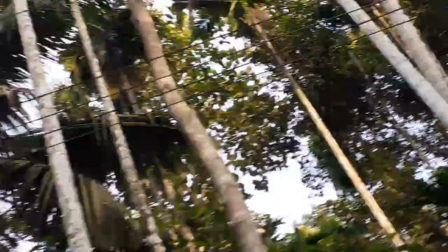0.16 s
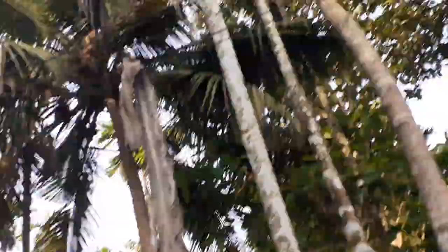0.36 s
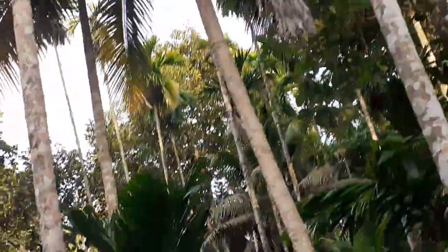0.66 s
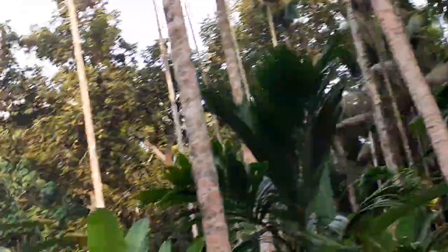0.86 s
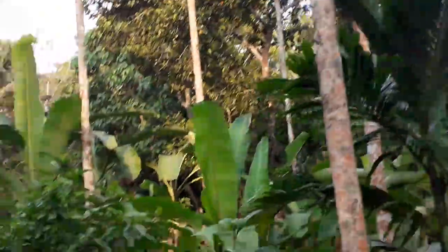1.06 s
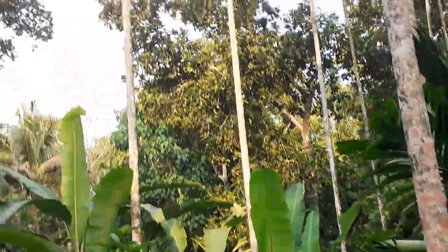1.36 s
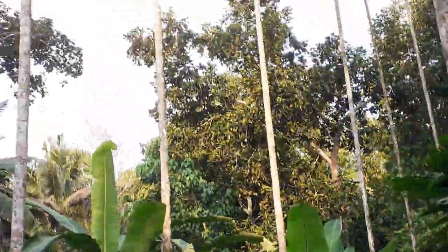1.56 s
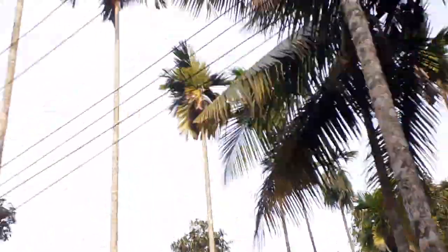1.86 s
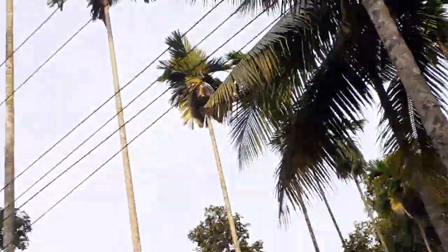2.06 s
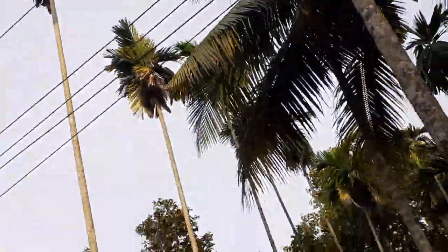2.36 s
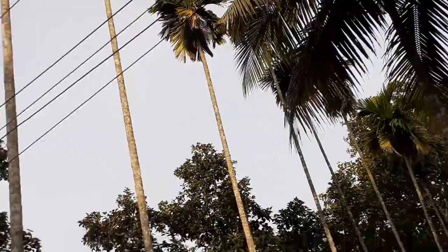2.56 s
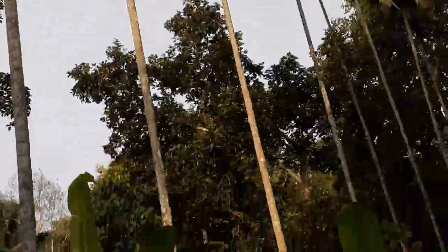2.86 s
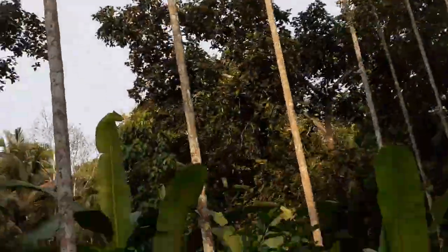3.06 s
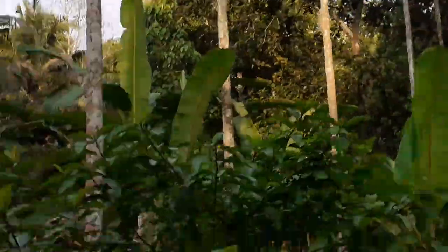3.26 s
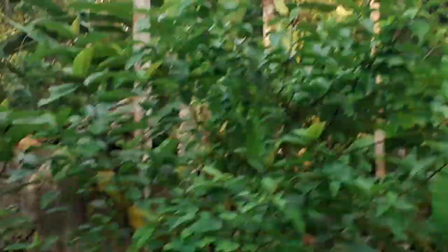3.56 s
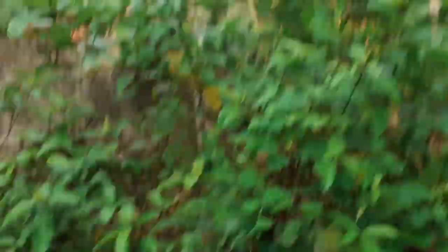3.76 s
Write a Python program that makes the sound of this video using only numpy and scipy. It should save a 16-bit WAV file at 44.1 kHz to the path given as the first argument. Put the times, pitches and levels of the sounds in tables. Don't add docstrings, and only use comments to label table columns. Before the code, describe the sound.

Cicadas shrill close by throughout, a dense raspy buzz near 9 kHz, nearly steady and fading very slightly. Slow footsteps crush dry leaves about every half second, with twig snaps clearest near 1.1, 1.9, 2.5 and 3.5 s. Dull knocks hit the handheld microphone at 0.3 and 2.5 s. Faint far crows caw; a small bird chips from 1.4 s, loudest at 2.9. Light breeze and foliage rustle softly.

```python
import sys
import numpy as np
from scipy import signal
from scipy.fft import rfft, irfft, next_fast_len
from scipy.io import wavfile
from scipy.ndimage import uniform_filter1d, map_coordinates

SR = 44100
rng = np.random.default_rng(int(sys.argv[2]) if len(sys.argv) > 2 else 0)


def dump(signal):
    limited = np.clip(np.atleast_2d(signal).T, -1, 1)
    pcm = np.round(limited * 32767).astype(np.int16)
    wavfile.write(sys.argv[1], SR, pcm)


def to_linear_factor(level_db):
    exponent = np.asarray(level_db, float) / 20
    return 10 ** exponent


N = 171990


# t [s], level [dB]
CHORUS_LEVEL = [(0, -42), (.22, -39.5), (.6, -40.5), (1.0, -41.5), (1.5, -41), (2.0, -41), (2.4, -41.5),
                (2.8, -41.5), (3.2, -42), (3.6, -42), (3.9, -42.5)]
# f [Hz], width [Hz], spread between singers [Hz], level [dB]
CICADA_BODIES = [(2247, 100, 28.4, -15), (2248, 390, 71, -16), (4600, 726, 150, -15.5),
                 (6670, 1560, 215, -23), (8214, 610, 150, -15), (8950, 450, 111, 0.5), (9460, 190, 75, -18),
                 (11170, 580, 91, -29), (13400, 1000, 150, -28.5)]


def cicadas():
    singers = 7
    click_hz, rate_spread, rate_drift, click_rough = 199.35, 0.15, 0.03, 0.51
    swell_db, slow_swell_db = 2.5, 0.6
    far_singers = 0.092
    trains = []
    for place in np.linspace(-1, 1, singers):
        rate = click_hz * (1 + rate_spread * place + rate_drift * wobble(12))
        turns = np.cumsum(rate) / SR
        clicks = np.diff(np.floor(turns), prepend=0) * (1 + click_rough * rng.standard_normal(N))
        clicks = clicks + far_singers * rng.standard_normal(N)
        trains.append(clicks * to_linear_factor(swell_db * wobble(15) + slow_swell_db * wobble(2.35)))
    f, spectra = np.fft.rfftfreq(N, 1 / SR), rfft(np.array(trains), N)
    total = 0
    for hz, wide, spread, db in CICADA_BODIES:
        tuned = hz + spread * rng.permutation(np.linspace(-1.5, 1.5, singers))[:, None]
        late = np.exp(-2j * np.pi * f * rng.uniform(0, 0.1, (singers, 1)))
        band = np.sum(spectra * late * peak(f, tuned, wide), axis=0)
        total = total + to_linear_factor(db) * band / np.linalg.norm(band) * N / np.sqrt(2)
    return to_linear_factor(curve(CHORUS_LEVEL)) * irfft(total, N)[:N]


# t [s], length [s], level [dB]
KATYDID_SPELLS = [
    (0, 0.6, -56),
    (1.334, 0.32, -58),
]


def katydid():
    t = np.arange(N) / SR
    spells = 0
    for s, long, db in KATYDID_SPELLS:
        spells = spells + to_linear_factor(db) * np.clip(np.minimum(t - s + 0.058, s + long - t) / 0.12, 0, 1)
    return spells * rush(lambda f: peak(f, 9700, 860), patchy_db=1.5)


# t [s], length [s], hiss level [dB], snap level [dB], hiss tilt [dB/octave]
FOOTSTEPS = [
    (0.177, 0.072, -49, -52.5, -4),
    (0.726, 0.063, -49.5, -50, -14),
    (1.276, .11, -48.5, -53.5, -8.5),
    (1.88, 0.047, -53, -51, -2),
    (2.392, 0.085, -47.5, -49.5, -7),
    (2.973, 0.071, -65, -58.5, 1),
    (3.413, 0.038, -58, -64, -3),
    (3.4803, 0.07, -44, -52, -6.5),
]


def steps():
    grains, grain_hz, grain_octaves, grain_cycles, grain_db = 22, 1644, 0.96, 2.8, 4.5
    fade_db, tail_s, flicker_db = -10, 0.35, 3
    out, t = np.zeros(N), np.arange(SR // 2) / SR
    for s, long, hiss_db, snap_db, tilt_db in FOOTSTEPS:
        def leaf_tone(f):
            return f * f / (f * f + 700 ** 2) * to_linear_factor(tilt_db * np.log2(1 + f / 1500))

        hiss = filtered(rng.standard_normal(N) * to_linear_factor(flicker_db * wobble(67)), leaf_tone)
        fade = fade_db * t / long - 20 * np.clip(t - long, 0, 9) / tail_s
        onset = np.clip(t / 0.00062, 0, 1)
        add(out, s, to_linear_factor(hiss_db + fade) * unit(hiss[:len(t)]) * onset)
        for when, pitch, size in zip(rng.random(grains), *rng.standard_normal((2, grains))):
            hz = grain_hz * 2 ** (grain_octaves * np.clip(pitch, -1, 2.5))
            add(out, s + 1.1 * long * when, to_linear_factor(snap_db + grain_db * size) * ping(hz, grain_cycles))
    return filtered(out, lambda f: (1j * f / (450 + 1j * f)) ** 2)


# t [s], peak level [dB], f [Hz], ring [cycles]
SNAPS_AND_THUDS = [(.171, -45.5, 695, 1.4), (0.2952, -50, 1160, 0.86), (.772, -46, 5500, 2), (.81, -41.5, 1010, 4.2),
                   (.947, -48, 744, 4), (1.102, -33, 1790, 0.72), (1.372, -42, 1960, 0.63), (2.292, -43, 1500, 1.7),
                   (2.59, -50, 1300, 1.9), (2.708, -60, 560, 1.5), (2.962, -55, 620, 2.1), (3.023, -36.5, 1250, 1.4),
                   (3.207, -44, 476, 1.2), (0.899, -50.5, 70, 2.3), (3.16, -44.5, 70, 1.6), (3.21, -54, 64.6, 1.5),
                   (3.24, -45, 74.5, 2.2), (3.578, -47.5, 640, 1.4), (3.675, -39.5, 1500, 1.4),
                   (.177, -39, 5000, 1.5), (0.22, -42, 1320, 2.5), (.231, -45, 1690, 2.6), (0.263, -44, 1200, 1.8),
         (1.879, -44, 885, 1.5), (1.8897, -30.5, 6050, 1.4), (1.89, -38.5, 1900, 1.8),
         (1.8927, -31, 6030, 1.7), (1.8916, -46, 1300, 1.2), (1.902, -37, 1100, 1.2),
         (1.913, -49, 2600, 1.5), (1.9327, -41, 1200, 2), (1.936, -38, 1200, 1.5),
         (1.9397, -29, 1040, 1.13), (1.944, -32, 1200, 2.8), (1.942, -43.5, 2780, 2.4),
         (2.392, -43, 1500, 1.8), (2.395, -44, 4800, 2.2), (2.403, -47, 1800, 2), (2.409, -37.5, 4830, 4.8),
         (2.415, -45.5, 1010, 2.3), (2.419, -41, 1600, 2.8), (2.424, -40, 4500, 1.1),
         (2.431, -42, 1400, 4.6), (2.4349, -35.5, 1700, 3.1), (2.443, -39, 1800, 2.5),
         (2.453, -34, 1930, 2.8), (2.4535, -42, 5500, 1.5), (2.482, -34, 5500, 1.6), (2.483, -46, 1500, 2),
         (2.4881, -30, 2000, 0.65), (3.429, -47.5, 1500, 8.2), (3.438, -48, 1500, 7.4),
         (3.431, -53, 5500, 20), (3.441, -54, 6100, 20), (3.451, -47, 6250, 20), (3.482, -39.5, 3170, 2),
         (3.483, -41, 11000, 3), (3.512, -38, 1500, 1.1), (3.522, -39.5, 1500, 3.6), (3.5375, -33, 1690, 2),
         (3.544, -37, 1810, 2), (3.547, -36.5, 1800, 2)]


def twigs():
    out = np.zeros(N)
    for s, db, hz, cycles in SNAPS_AND_THUDS:
        add(out, s, to_linear_factor(db) * ping(hz, cycles))
    return out


# t [s], peak level [dB], f [Hz]
CASE_KNOCKS = [
    (0.285, -38, 448),
    (0.2959, -19, 370),
    (2.4892, -22.5, 410),
]


def knocks():
    rise_s, sag, sag_s = 0.00061, 7.4, 0.00041
    out, t = np.zeros(N), np.arange(SR // 25) / SR
    for s, db, hz in CASE_KNOCKS:
        turns = hz * (t + sag * sag_s * (1 - np.exp(-t / sag_s)))
        u = t / rise_s / 3
        thump = (u * np.exp(1 - u)) ** 3
        add(out, s, -to_linear_factor(db) * thump * np.sin(2 * np.pi * (turns + 0.25)))
    return out


# t [s], level [dB], starting f [Hz]
BIRD_CHIPS = [
    (1.44, -46, 2510),
    (2.065, -44.5, 2530),
    (2.214, -41.5, 2559),
    (2.825, -52.5, 1736),
    (2.885, -35.5, 2496),
    (3.25, -52, 2346),
    (3.483, -40, 2530),
]


def chips():
    peak_s, fall, fall_s = 0.0074, 0.3, 0.00942
    tail_db, tail_s, rough = -16.5, 0.057, 0.71
    out, t = np.zeros(N), np.arange(SR // 5) / SR
    for s, db, hz in BIRD_CHIPS:
        pitch = hz * (1 - fall * (1 - np.exp(-t / fall_s)))
        tone = np.sin(2 * np.pi * np.cumsum(pitch) / SR)
        burst = (t / peak_s * np.exp(1 - t / peak_s)) ** 2
        tail = to_linear_factor(tail_db) * np.minimum(t / peak_s, 1) * np.exp(-t / tail_s)
        grain = 1 + rough * rasp(len(t), 470)
        add(out, s, to_linear_factor(db) * (burst + tail) * grain * tone)
    return out


# t [s], length [s], f [Hz], level [dB]
HIGH_CAWS = [
    (.02, 0.25, 1146, -61.5),
    (.66, 0.19, 1217, -53.5),
    (.9, 0.094, 1255, -62.5),
    (1.4, 0.28, 1263, -68.5),
    (1.935, 0.17, 1174, -52.5),
    (2.16, 0.16, 1180, -66),
    (3.135, 0.22, 1219, -56.5),
]


def high_crow():
    return crow(HIGH_CAWS, -34.0, 74.8, 1.0, 0.0101, 0.8, 0.035)


# t [s], length [s], f [Hz], level [dB]
LOW_CAWS = [
    (.47, 0.39, 891.4, -58.5),
    (1.55, 0.26, 903, -60),
    (1.63, 0.3, 1027, -66),
    (1.7, 0.18, 865, -72),
    (2.79, 0.17, 1098, -62.5),
    (3.23, 0.23, 419.5, -64.5),
]


def low_crow():
    return crow(LOW_CAWS, -10, 44.8, 1.0, 0.008, 0.3, 0.09)


def crow(calls, overtone_db, rattle_hz, rattle, hoarse, rough, arch):
    rise_s, fall_s = 0.036, 0.053
    out = np.zeros(N)
    for s, long, hz, db in calls:
        t = np.arange(round((long + fall_s) * SR)) / SR
        bow = np.sin(np.pi * np.clip(t / long, 0, 1)) ** 0.5 - 0.8
        pitch = hz * (1 + arch * bow + hoarse * wobble(54.25)[:len(t)])
        turn = 2 * np.pi * np.cumsum(pitch) / SR
        rattle_turn = 2 * np.pi * np.cumsum(rattle_hz * (1 + 0.11 * wobble(24.9)[:len(t)])) / SR
        flutter = 1 + rattle * np.sin(rattle_turn) + rough * rasp(len(t), 153)
        shape = np.clip(np.minimum(t / rise_s, (long + fall_s - t) / fall_s), 0, 1)
        tone = np.sin(turn) + to_linear_factor(overtone_db) * np.sin(2 * turn)
        add(out, s, to_linear_factor(db) * shape * flutter * tone)
    return out


# t [s], level [dB]
GUSTS = [(0.0, -81), (0.19, -67), (0.3, -58), (0.45, -64.5), (0.63, -63.5), (0.84, -58), (0.91, -60),
         (1.0, -61), (1.34, -65), (1.6, -74), (1.82, -66), (2.38, -66), (2.5, -62), (3.12, -67),
         (3.17, -53), (3.3, -56.5), (3.4, -58.5), (3.9, -62.5)]
# f [Hz], level [dB]
BUFFET_TONE = [(13, -62), (22, -28), (40, 5.5), (59, 1), (112, -4.5), (166, -10.5), (220, -20),
               (290, -19.5), (480, -120)]


def breeze():
    buffet = rush(lambda f: to_linear_factor(along(BUFFET_TONE, f)), patchy_db=2.5)
    return to_linear_factor(curve(GUSTS) + 0.6 * wobble(49)) * buffet


# t [s], level [dB]
LEAF_LEVEL = [(0.0, -59.5), (0.14, -61.5), (0.54, -63.5), (0.87, -59), (1.18, -64), (1.55, -58),
              (1.83, -60.5), (2.05, -69), (2.57, -67), (2.81, -72.5), (3.02, -62), (3.14, -66.5),
              (3.25, -51.5), (3.4, -60), (3.69, -63), (3.9, -68)]
# f [Hz], level [dB]
LEAF_TONE = [(110, -3.5), (200, -5.5), (450, -1.5), (800, -5.5), (1150, -1), (1500, -9.5), (2400, -110)]


def undergrowth():
    rustle = rush(lambda f: to_linear_factor(along(LEAF_TONE, f)), patchy_db=3.5)
    return to_linear_factor(curve(LEAF_LEVEL) - 1.5 + wobble(18)) * rustle


# t [s], level [dB]
MURMUR_LEVEL = [(0.0, -70), (0.15, -72), (0.76, -58.5), (1.13, -73), (1.35, -55), (1.45, -66), (2.4, -62),
                (2.62, -65), (2.79, -72), (3.49, -56), (3.68, -61.5), (3.9, -69.5)]


def murmur():
    return to_linear_factor(curve(MURMUR_LEVEL)) * rush(lambda f: peak(f, 1500, 1640), patchy_db=4)


# t [s], level [dB]
CRICKET_LEVEL = [(0.0, -58.5), (0.15, -55), (0.32, -49), (0.55, -48.5), (0.93, -52.5), (1.1, -55.5),
                 (1.62, -107), (3.3, -138), (3.52, -55), (3.65, -51.5), (3.9, -50)]


def far_crickets():
    crowd = rush(lambda f: peak(f, 3025, 1460), patchy_db=-1.0)
    return to_linear_factor(curve(CRICKET_LEVEL) - 8.0) * (crowd + single_crickets())


# f [Hz], level over the crowd [dB]
CRICKET_STRANDS = [(2750, -14), (3040, -6), (3170, -9.5), (3410, -15.5)]


def single_crickets():
    out = 0
    for hz, db in CRICKET_STRANDS:
        pitch = hz * (1 + 0.02 * wobble(11))
        swell = to_linear_factor(db + 3.5 * wobble(14))
        out = out + swell * np.sin(2 * np.pi * np.cumsum(pitch) / SR)
    return out


# f [Hz], level [dB]
AIR_TONE = [(2300, -53), (2600, -26), (3300, -53), (4000, 2), (5700, -12.5), (10500, -7), (12200, -13.5),
            (15700, -13.5)]


def far_hiss():
    return to_linear_factor(-61) * rush(lambda f: to_linear_factor(along(AIR_TONE, f)), patchy_db=1.5)


def grove(x, t60):
    tail = rng.standard_normal(SR // 2) * to_linear_factor(-60 * np.arange(SR // 2) / SR / t60)
    return signal.fftconvolve(np.pad(x, (600, 0)), tail / np.linalg.norm(tail))[:N]


def unit(x):
    return x / np.sqrt(np.mean(x ** 2) + 1e-20)


def along(points, hz):
    f, v = np.transpose(points)
    return np.interp(np.log(hz + 1), np.log(f + 1), v)


def curve(rows):
    s, v = np.transpose(rows)
    return np.interp(np.arange(N) / SR, s, v)


def wobble(rate):
    knots = rng.standard_normal(int(N * 60 / SR) + 4)
    return map_coordinates(knots, [np.arange(N) * min(rate, 59) / SR])


def rasp(count, wide_hz):
    span = max(1, round(SR / wide_hz / 2))
    smooth = uniform_filter1d(uniform_filter1d(rng.standard_normal(SR), span), span)
    return unit(smooth)[:count]


def ping(hz, cycles):
    u = np.arange(SR // 25) / SR * hz
    return np.sin(2 * np.pi * u) * np.exp(-2 * u / cycles) * (1 - np.exp(-u / 0.37)) * 3


def filtered(x, response):
    m = next_fast_len(N + SR // 2)
    return irfft(rfft(x, m) * response(np.fft.rfftfreq(m, 1 / SR)), m)[..., :N]


def peak(f, hz, wide):
    return (1j * f * wide / (hz * hz - f * f + 1j * f * wide)) ** 3


def rush(response, patchy_db):
    z = signal.stft(rng.standard_normal(N), nperseg=512)[2]
    field = uniform_filter1d(rng.standard_normal(z.shape), size=5, axis=0)
    field = uniform_filter1d(field, size=10, axis=1)
    noise = signal.istft(z * to_linear_factor(patchy_db * unit(field)), nperseg=512)[1][:N]
    return unit(filtered(noise, response))


def add(out, s, x):
    part = out[round(s * SR):][:len(x)]
    part += x[:len(part)]


# f [Hz], side over mid [dB]
SIDE_LEVEL = [(60, -27), (150, -33), (400, -28), (7200, -26.5), (8000, -9.5), (9300, -10.5), (13400, -15),
              (15700, -41)]
# f [Hz], turn [radians]
SIDE_PHASE = [(7500, 1.2), (8200, 1.1), (8700, .08), (9600, -.05)]


def two_ports(mid, scattered):
    def lean(f):
        return to_linear_factor(along(SIDE_LEVEL, f)) * np.exp(1j * along(SIDE_PHASE, f))

    side = filtered(mid + to_linear_factor(-13) * grove(mid, 0.045), lean)
    side = side + to_linear_factor(-44) * grove(scattered, 0.02)
    return np.array([mid + side, mid - side])


def scene():
    song = cicadas() + katydid()
    walker = steps() + twigs() + knocks()
    birds = chips() + high_crow() + low_crow()
    background = breeze() + undergrowth() + murmur() + far_crickets() + far_hiss()
    rest = walker + birds + to_linear_factor(-1.5) * grove(birds, 0.76) + background
    return two_ports(song + rest, rest)


def top_cut(x):
    return signal.sosfilt(signal.butter(12, 15660, fs=SR, output="sos"), x)


def record(dry):
    heard = filtered(dry, lambda f: (1j * f / (38 + 1j * f)) ** 2)
    return top_cut(heard)


dry = scene()
out = record(dry)
dump(out)
```